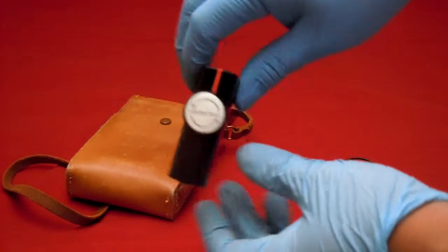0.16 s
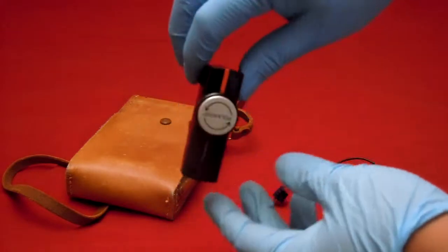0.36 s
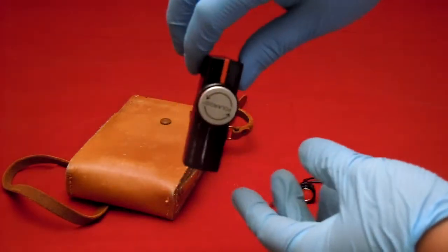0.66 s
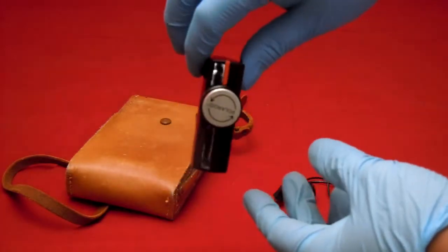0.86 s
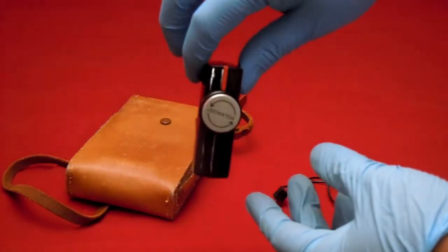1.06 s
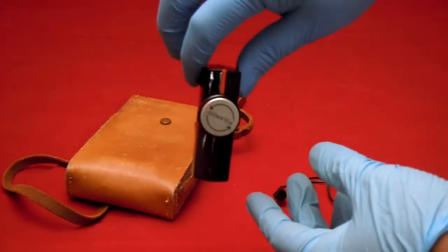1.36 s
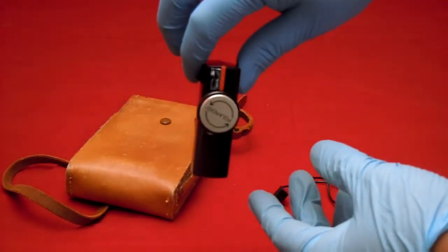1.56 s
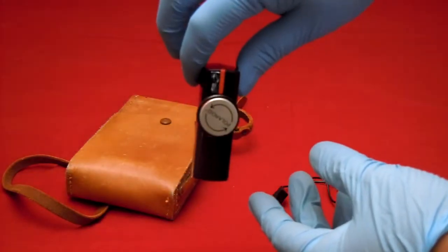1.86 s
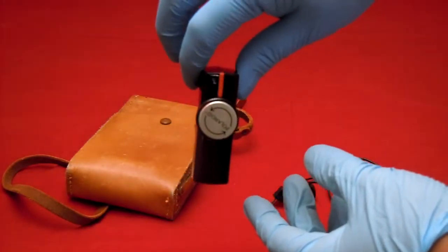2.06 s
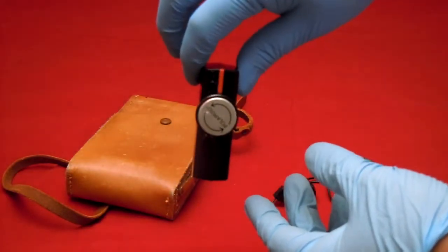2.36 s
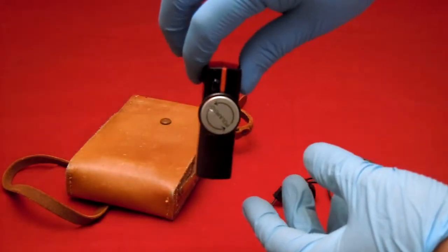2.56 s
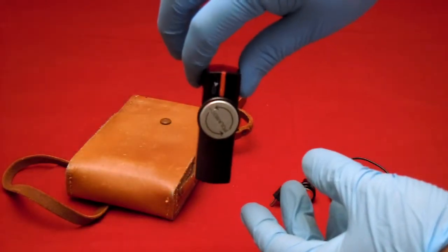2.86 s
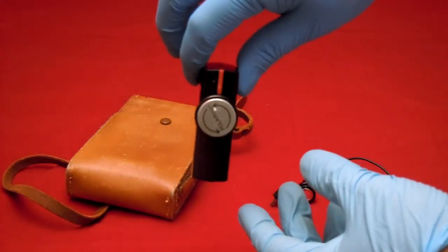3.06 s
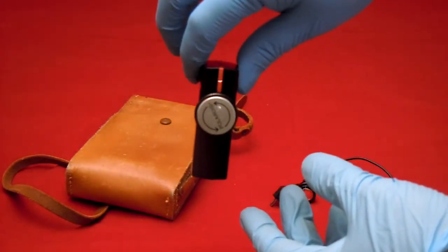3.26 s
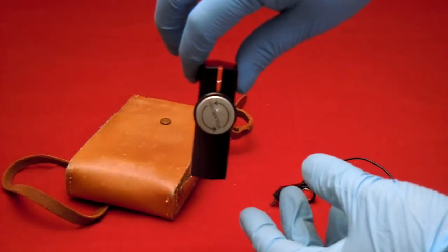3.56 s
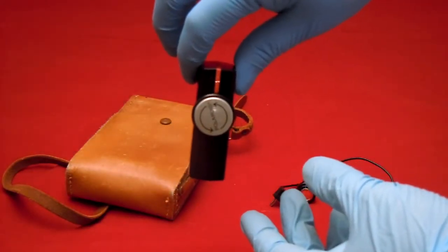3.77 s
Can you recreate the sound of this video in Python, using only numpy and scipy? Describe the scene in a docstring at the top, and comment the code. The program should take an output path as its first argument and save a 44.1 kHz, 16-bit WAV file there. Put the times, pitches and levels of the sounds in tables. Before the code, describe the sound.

A small wind-up mechanical timer runs continuously close to a stereo microphone, its very rapid ticks merging into a bright, scratchy metallic buzz that wobbles and slows slightly; soft room noise and a low fan-like hum lie behind.

```python
"""Clockwork timer in a quiet room

A small clockwork self-timer runs down, held in the hand close to the microphone.
Its escapement strikes, scrapes and rings the metal case about 200 times a second; the rate mostly sags
as the spring unwinds, and it wobbles with each turn of an off-centre wheel.
Behind it are filtered room noise, a fan-like hum and a thin whine made of sines, and three soft low thuds."""
import sys
import numpy as np
from scipy import signal
from scipy.fft import rfft, irfft
from scipy.io import wavfile
from scipy.ndimage import uniform_filter1d

SR = 44100
rng = np.random.default_rng(int(sys.argv[2]) if len(sys.argv) > 2 else 0)


def generate_wav(signal):
    """Clip the signal to [-1, 1] and save it as 16-bit WAV at the path in sys.argv[1]."""
    frames = np.transpose(np.atleast_2d(signal))
    scaled = np.clip(frames, -1, 1) * 32767
    pcm = np.round(scaled).astype(np.int16)
    wavfile.write(sys.argv[1], SR, pcm)


N = 171990  # length in samples


def undb(db):
    """Turn decibels into a gain."""
    return 10 ** (np.asarray(db) / 20)


def unit(x):
    """Scale a sound to an rms of 1."""
    return x / np.sqrt(np.mean(x ** 2))


def walk(rate):
    """Slow random drift with rms 1, made by smoothing random steps drawn `rate` times a second."""
    hold = int(SR / rate)
    steps = np.repeat(rng.standard_normal(N // hold + 1), hold)
    smooth = uniform_filter1d(uniform_filter1d(steps, hold), hold)
    return unit(smooth[:N])


def colour(x, points, power=1):
    """Filter x to follow (f/Hz, level/dB) points, without sounding ahead of x; power scales the dB."""
    hz, db = np.array(points, float).T
    size = 4096
    f = np.maximum(np.arange(size // 2 + 1) * SR / size, 1)
    log_gain = np.log(undb(np.interp(np.log(f), np.log(hz), db)))
    # folding the cepstrum forward gives the minimum-phase filter
    cepstrum = irfft(power * log_gain)
    cepstrum[1:size // 2] *= 2
    cepstrum[size // 2 + 1:] = 0
    response = irfft(np.exp(rfft(cepstrum)))
    return signal.fftconvolve(x, response)[:N]


def clicks(times, sizes):
    """One-sample impulses at the given times; any past the end are dropped."""
    places = np.clip(times * SR, 0, N).astype(int)
    return np.bincount(places, sizes, N + 1)[:N]


def ringing(force, modes, t):
    """A force sets off fading sine modes (f/Hz, fall by 60 dB/s, level/dB); the sum has rms 1."""
    age = t[:SR // 3]
    ring = 0
    for hz, t60, db in modes:
        ring = ring + undb(db) * np.sin(2 * np.pi * hz * age) * np.exp(-np.log(1000) * age / t60)
    return unit(signal.fftconvolve(force, ring)[:N])


TICKS_PER_TURN, WHEEL_FASTEST_S = 42.6, 1.787  # wheel turn in ticks; a moment when it runs fastest
WANDER_HZ, FORCE_DB_PER_HZ = 2.0, 0.08  # random rate drift; faster running strikes harder
# How the spring drive runs, with levels before TIMER_DB and the swing are added:
# t/s, tick rate/Hz, depth of the wobble/Hz, level/dB
SPRING_RUN = [(0, 219, 4.76, -21), (0.55, 208, 4.14, -21.0), (0.8, 210, 4.7, -22), (1.15, 209, 7.74, -21),
              (1.45, 202, 6.8, -22), (1.8, 205, 8.5, -22.5), (2.25, 199, 3.63, -22), (2.7, 199, 2.5, -22.5),
              (3.0, 189, 2.7, -23), (3.5, 187, 1.5, -23.5), (3.9, 195, 1.14, -22)]


def drive(t):
    """Tick rate and level: the spring slackens and an off-centre wheel swings the torque once a turn."""
    s, hz, depth, db = np.array(SPRING_RUN).T
    rate = np.interp(t, s, hz)
    turns = np.cumsum(rate) / SR / TICKS_PER_TURN
    turns_from_fastest = turns - np.interp(WHEEL_FASTEST_S, t, turns)
    wobble = np.interp(t, s, depth) * np.cos(2 * np.pi * turns_from_fastest)
    swing = wobble + WANDER_HZ * walk(22)
    return rate + swing, np.interp(t, s, db) + FORCE_DB_PER_HZ * swing


TICK_JITTER, TICK_SCATTER_DB = 0.055, 1.5  # random spread: share of a period, and strength
LIMP_DB = -0.1  # strength added on even ticks and taken off odd ones
BOUNCE_DB, BOUNCE_S = -4, 0.0005  # typical level against the strike, and typical delay
DROP_DB, DROP_SHARE = -7, 0.5  # typical level; where in the period the next tooth lands
SCRAPE_DB, SCRAPE_S, GEARS_DB = 2.0, 0.0013, -3.5  # levels against the clicks; scrape decay time


def escapement(t, rate):
    """Teeth strike a pallet, bounce, scrape and drop; gives two forces with shared timing, unlike noise."""
    phase = np.cumsum(rate) / SR
    chance = rng.standard_normal((8, 1000))
    k = np.arange(1000)  # more ticks than needed

    def when(cycles):
        return np.interp(cycles, phase, t, right=2 * t[-1])  # unused ticks go past the end

    beat = k + TICK_JITTER * chance[0]
    strike = when(beat)
    bounce = strike + BOUNCE_S * np.exp(0.4 * chance[3])
    drop = when(beat + DROP_SHARE + 0.13 * chance[1])
    strike_size = undb(TICK_SCATTER_DB * chance[2] + LIMP_DB * (-1) ** k)
    bounce_size = strike_size * undb(BOUNCE_DB + 2.34 * chance[4])
    drop_size = undb(DROP_DB + 3.6 * chance[5])
    times = np.concatenate([strike, bounce, drop])
    sizes = np.concatenate([strike_size, bounce_size, drop_size])
    # every contact starts a short, fading slide
    sliding = signal.lfilter([1], [1, -np.exp(-1 / (SCRAPE_S * SR))], clicks(times, sizes))
    forces = []
    for _ in range(2):
        contact = unit(clicks(times, sizes * rng.choice([-1, 1], len(times))))
        scrape = undb(SCRAPE_DB) * unit(sliding * rng.standard_normal(N))
        gears = undb(GEARS_DB) * rng.standard_normal(N)
        forces.append(unit(contact + scrape + gears))
    return forces


RING_DB, RING_T60_S = -8.5, 0.081  # level against the case sound; time to fall by 60 dB
ROOM_DB, ROOM_T60_S = -8, 0.22  # level against the direct sound; time to fall by 60 dB
TREBLE_HZ = 9300  # where the shifting treble begins
# Tone colour of the case, relative levels: f/Hz, level/dB
CASE_COLOUR = [(300, -21.5), (700, -21), (1300, -24), (1800, -13.5), (2150, -16.5), (2750, -20),
               (3300, -14.5), (3650, -14), (4100, -13.5), (4700, -13.5), (4900, -3.5), (5250, -8),
               (5500, -9.5), (5780, -9.5), (5950, -3), (6300, -4), (6750, 1), (7100, -8.5), (7330, -3.5),
               (7500, 0), (7950, 1.5), (8300, -2), (8850, -3), (9400, -5), (10100, -8.5), (10700, -11.5),
               (11800, -12), (12400, -12.5), (13100, -16), (14000, -16)]
# Ringing modes of plates and wheels, levels against each other: f/Hz, level/dB
METAL_MODES = [(3661, -50.5), (4382, -50), (5200, -45), (5582, -55), (5927, -46), (6342, -44.5),
               (6584, -49), (6740, -43), (7827, -47), (8748, -45.5), (8877, -42), (9308, -51), (10223, -48),
               (12414, -49)]
# Low modes of the hollow case, levels against each other: f/Hz, fall by 60 dB/s, level/dB
HOLLOW_MODES = [(1770, 0.035, -20), (1809, 0.053, 2), (1924, 0.041, 0)]
# Shifting colour of the whir: t/s, hollow modes level/dB against the case sound, top treble level/dB
WHIR_SHADE = [(0, -15, 0.5), (.55, -16.5, -1.5), (.8, -19, -1), (1.1, -15.5, -0.5), (1.3, -21.5, -0.5),
              (2.0, -18.5, -2), (2.19, -14, -2), (2.35, -20.5, -2), (3.3, -17, -1), (3.9, -19.5, -0.5)]


def body(force, t):
    """The case answers briefly, plates and hollow ring on, and the room adds a short tail."""
    s, hollow_db, treble_db = np.array(WHIR_SHADE).T
    shaken = force * rng.standard_normal(N)
    case = unit(colour(force, CASE_COLOUR))
    metal_modes = [(hz, RING_T60_S, db) for hz, db in METAL_MODES]
    metal = undb(RING_DB) * ringing(shaken, metal_modes, t)
    hollow = undb(np.interp(t, s, hollow_db)) * ringing(shaken, HOLLOW_MODES, t)
    sound = case + metal + hollow
    high_pass = signal.butter(2, TREBLE_HZ, "high", fs=SR, output="sos")
    treble = signal.sosfiltfilt(high_pass, sound)
    sound = sound + (undb(np.interp(t, s, treble_db)) - 1) * treble
    # the room tail is fading noise
    age = t[:SR // 3]
    tail = rng.standard_normal(len(age)) * np.exp(-np.log(1000) * age / ROOM_T60_S)
    echo = unit(signal.fftconvolve(sound, tail)[:N])
    return unit(sound + undb(ROOM_DB) * echo)


TIMER_DB = 0.5  # added to the drive level
EVEN_BELOW_HZ = 4500  # left and right lean equally below this
# Difference between the channels against their sum: f/Hz, level/dB
STEREO_WIDTH = [(1200, -45), (2000, -62), (3300, -66), (4400, -35), (4900, -10), (7000, -13.5),
                (8500, -7.5), (11000, -5), (14000, -7)]
# Left over right in the treble: f/Hz, level/dB
TREBLE_LEAN = [(5000, 1.3), (6500, 2), (7800, 3.5), (9500, 0), (12000, -1.4)]


def timer(t):
    """The whirring timer; its treble reaches the two microphones differently."""
    rate, db = drive(t)
    mid, side = [body(force, t) * undb(db + TIMER_DB) for force in escapement(t, rate)]
    side = colour(side, STEREO_WIDTH)
    lean = [(EVEN_BELOW_HZ, 0)] + list(TREBLE_LEAN)
    # each channel takes half of the lean, in opposite directions
    left = colour(mid + side, lean, 0.5)
    right = colour(mid - side, lean, -0.5)
    return np.array([left, right])


AIR_DB = -35.5  # rms level of the part shared by both channels
# Colour of the room noise, relative level in each Hz: f/Hz, level/dB
AIR_COLOUR = [(20, 0), (35, 2.5), (80, -1.5), (150, -5), (220, 4.5), (270, -0.5), (370, 2), (530, -2),
              (650, 0), (800, -1), (1300, -5.5), (2600, -10), (8000, -20.5)]
# Difference between the channels against their sum: f/Hz, level/dB
AIR_STEREO_WIDTH = [(25, -6), (60, -10), (130, -10.5), (300, -19), (1200, -20), (1900, -47)]


def room_noise():
    """Soft room noise: coloured random noise, with a second one spreading it between the channels."""
    mid, side = [unit(colour(rng.standard_normal(N), AIR_COLOUR)) for _ in range(2)]
    side = colour(side, AIR_STEREO_WIDTH)
    return undb(AIR_DB) * np.array([mid + side, mid - side])


HUM_WAVER_DB, HUM_DRIFT_HZ = 0.9, 0.6  # random spread of level and pitch
# Tones of the hum, rms levels about which they waver: f/Hz, level/dB
HUM_TONES = [(147, -55.5), (239.8, -38), (371, -54.5), (442, -52.5), (564.5, -51), (661, -49)]


def hum():
    """A fan-like hum: sines whose level and pitch each drift a little."""
    tones = 0
    for hz, db in HUM_TONES:
        level = undb(db + HUM_WAVER_DB * walk(9.03))
        phase = 2 * np.pi * np.cumsum(hz + HUM_DRIFT_HZ * walk(4.99)) / SR
        tones = tones + level * np.sin(phase)
    return np.sqrt(2) * tones  # rms level to sine peak


WHINE_HZ, WHINE_DB, WHINE_LEAD = 12900, -40.5, 1.6  # pitch; rms level; lead of left channel in radians


def whine():
    """A thin high whine: one slightly drifting sine, with the left channel's phase ahead."""
    phase = 2 * np.pi * np.cumsum(WHINE_HZ + 3 * walk(25.2)) / SR
    return np.sqrt(2) * undb(WHINE_DB) * np.sin(phase + np.array([[WHINE_LEAD], [0]]))


BUMP_RISE_S = 0.016  # time to the loudest point
# Soft low thuds, levels at the top of their swell: t/s, f/Hz, level/dB
LOW_BUMPS = [(2.879, 69.4, -39.5), (3.169, 43, -41), (3.399, 37.93, -37)]


def bumps(t):
    """Faint low thuds: sines that swell and die within a few cycles."""
    thuds = 0
    for s, hz, db in LOW_BUMPS:
        age = np.maximum(t - s, 0)
        swell = age / BUMP_RISE_S * np.exp(1 - age / BUMP_RISE_S)
        thuds = thuds + undb(db) * swell * np.sin(2 * np.pi * hz * age)
    return thuds


def scene():
    """The timer in front of the room sounds, with the low thuds."""
    t = np.arange(N) / SR
    return timer(t) + room_noise() + hum() + whine() + bumps(t)


TOP_HZ = 14050  # highest pitch let through


def record(dry):
    """A steep low-pass filter removes the very top of the treble."""
    low_pass = signal.ellip(16, 0.1, 90, TOP_HZ, fs=SR, output="sos")
    return signal.sosfilt(low_pass, dry)


dry = scene()
out = record(dry)
generate_wav(out)
```